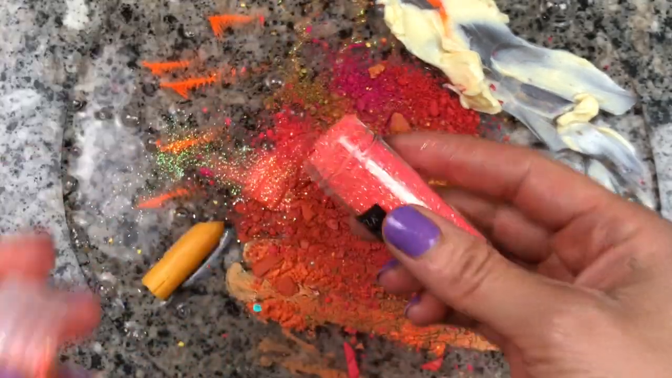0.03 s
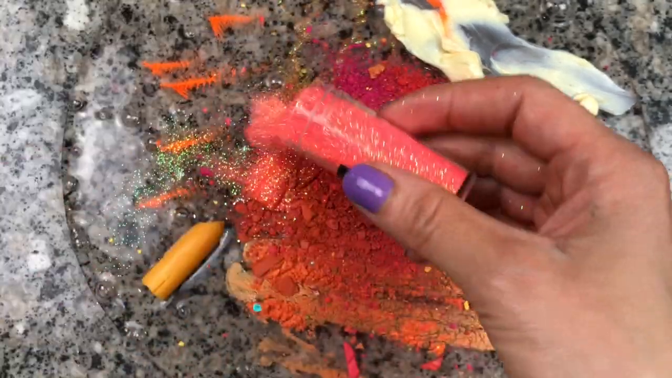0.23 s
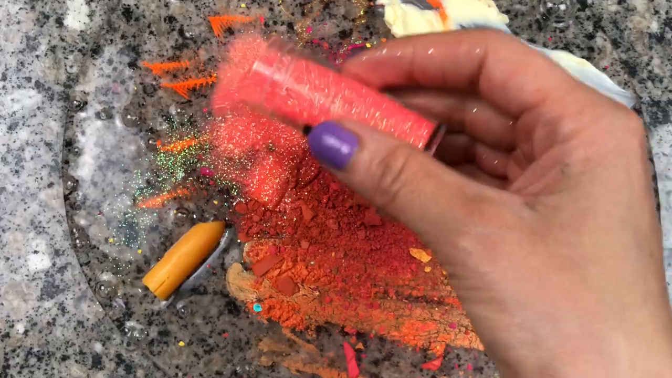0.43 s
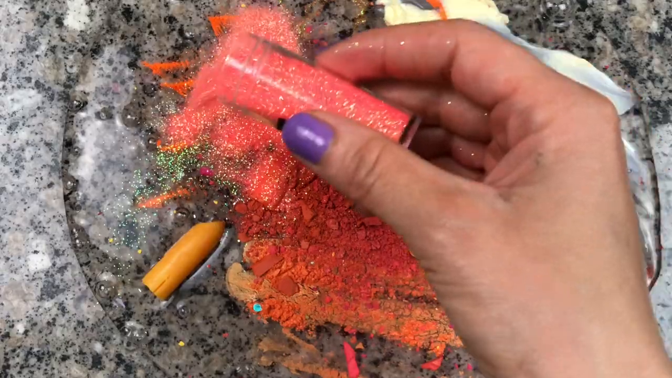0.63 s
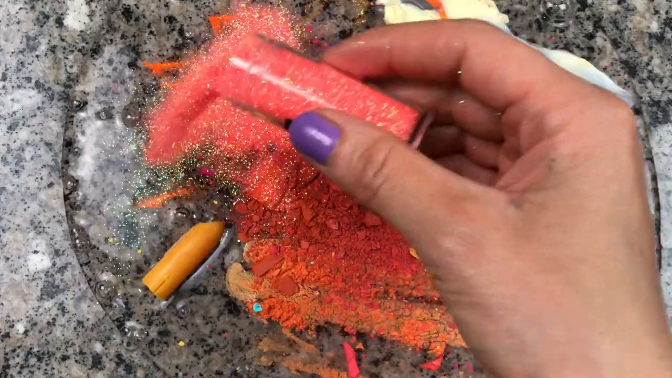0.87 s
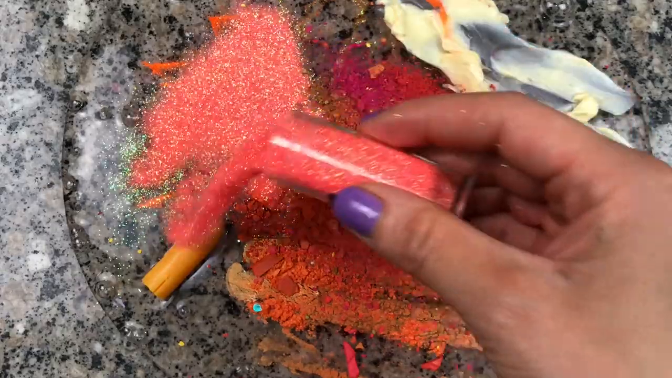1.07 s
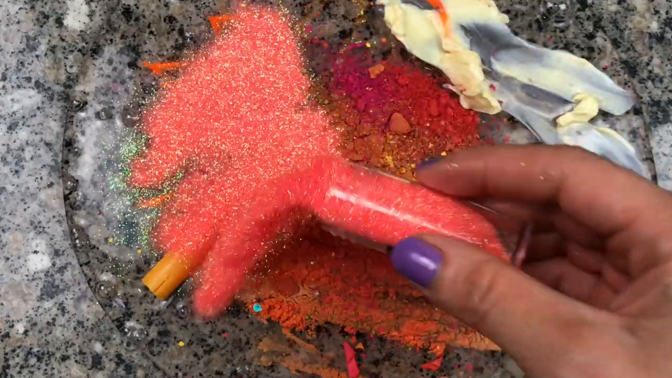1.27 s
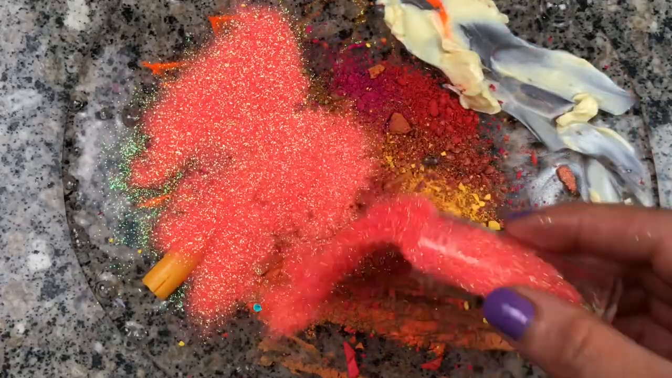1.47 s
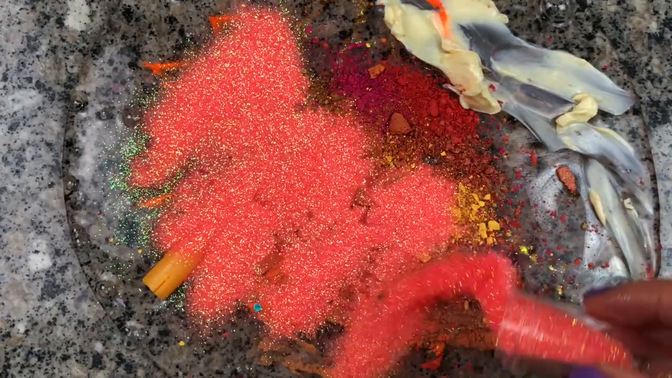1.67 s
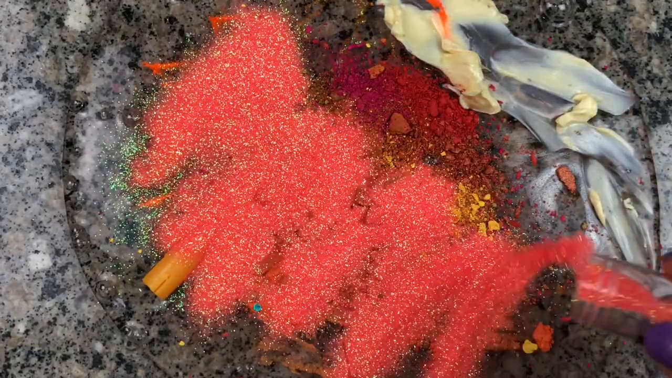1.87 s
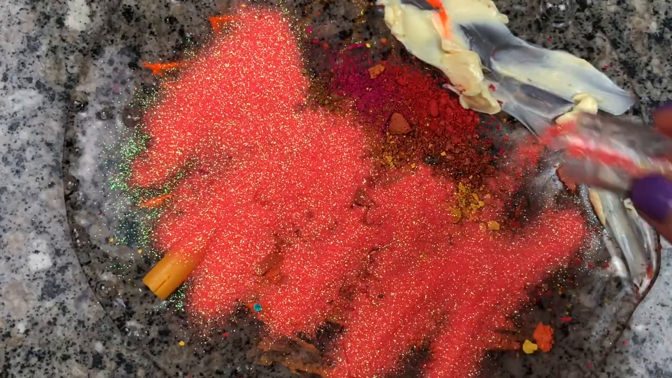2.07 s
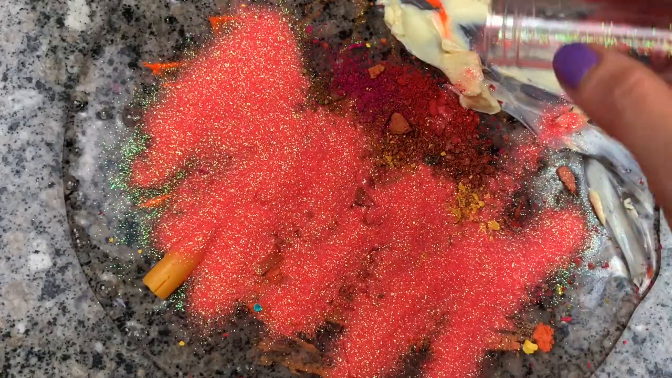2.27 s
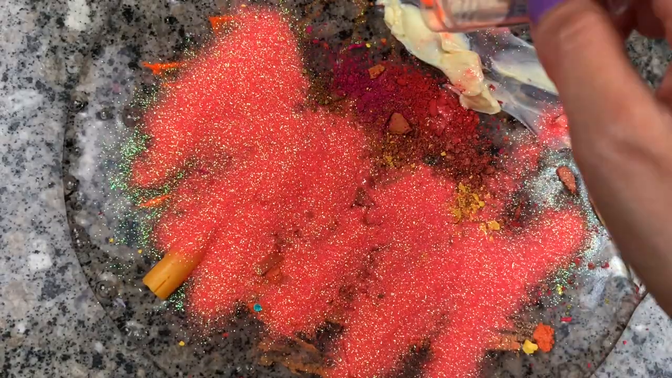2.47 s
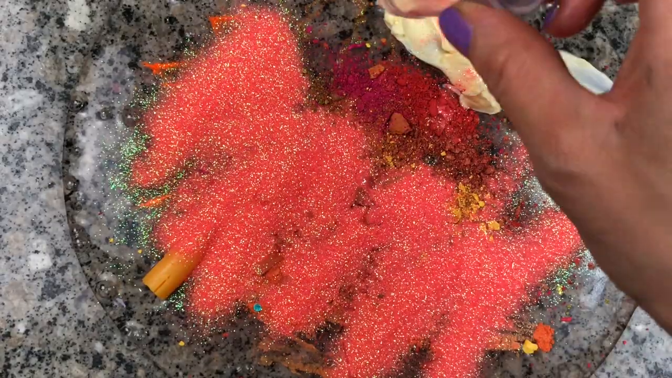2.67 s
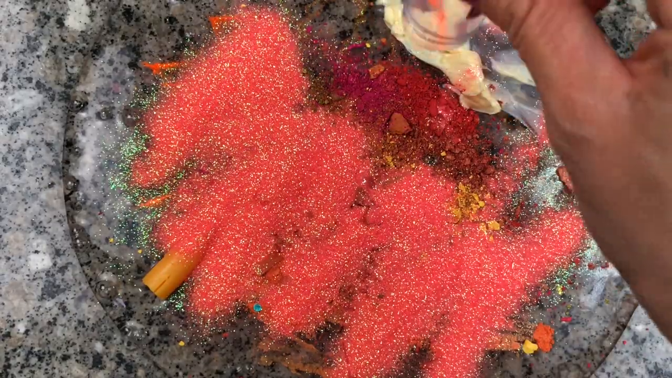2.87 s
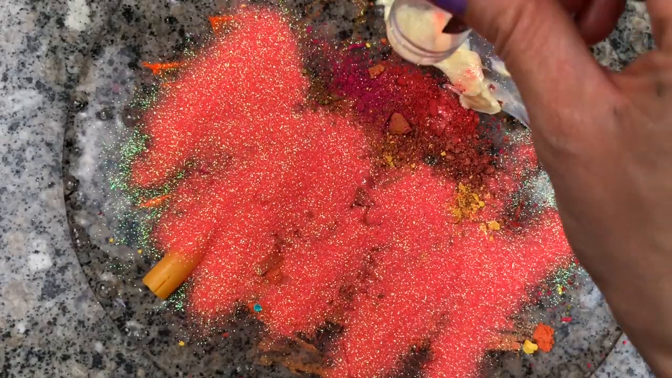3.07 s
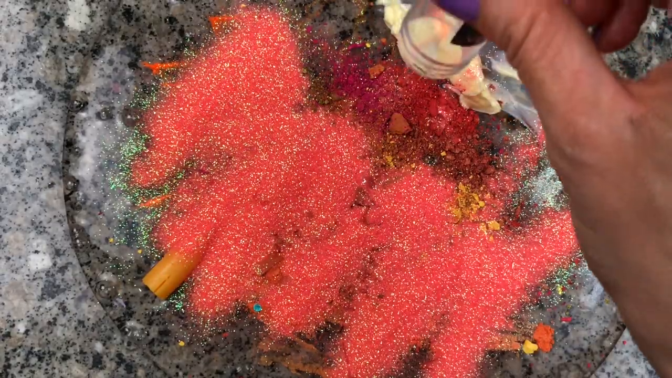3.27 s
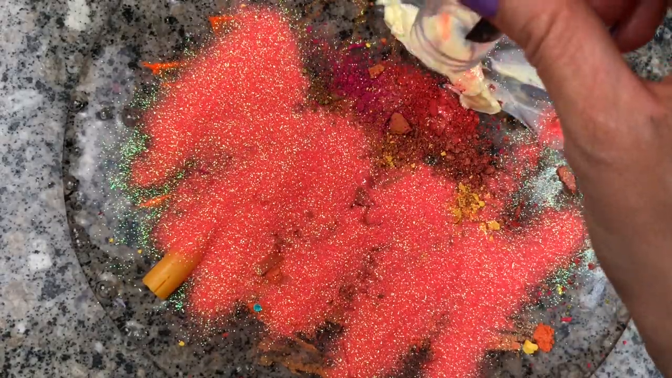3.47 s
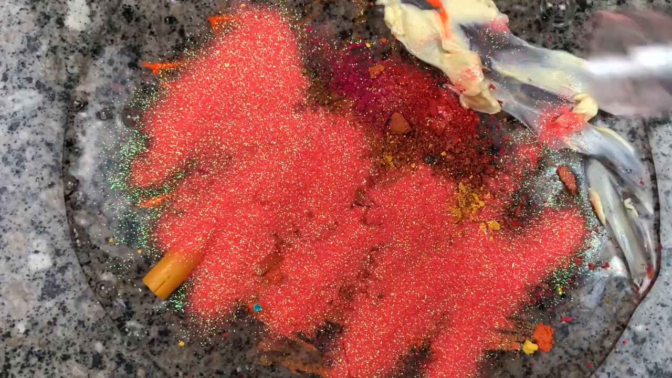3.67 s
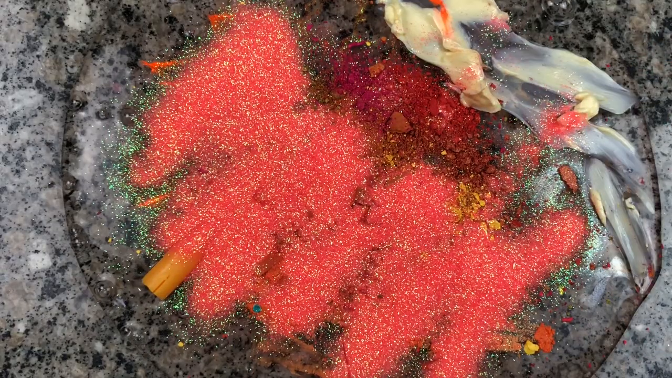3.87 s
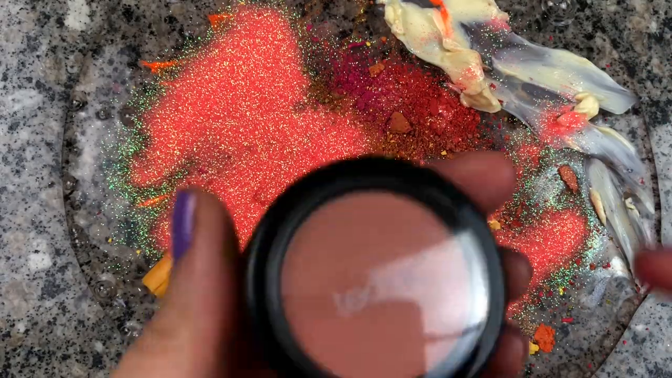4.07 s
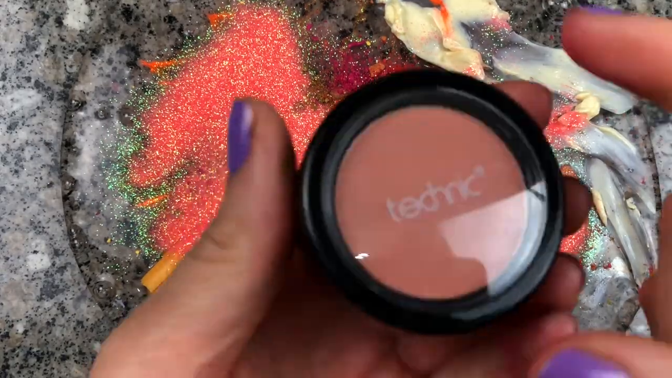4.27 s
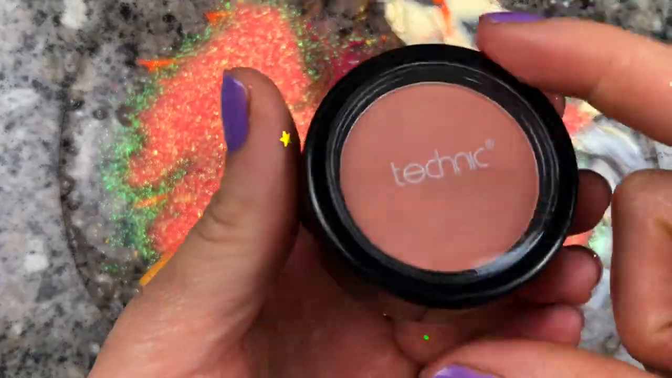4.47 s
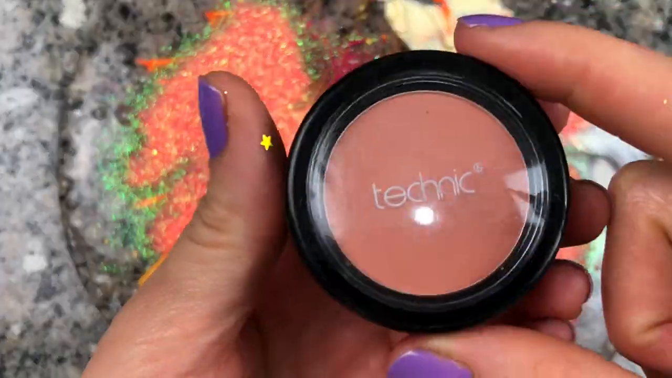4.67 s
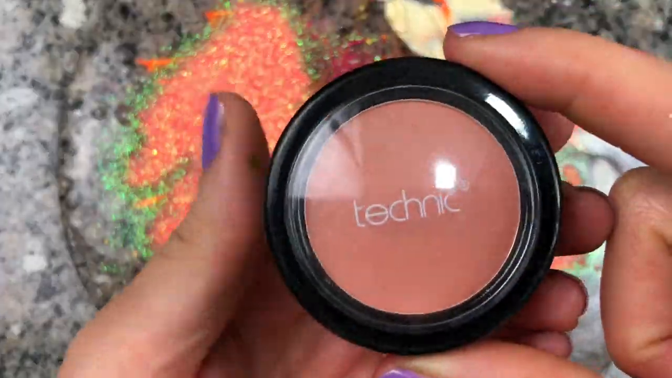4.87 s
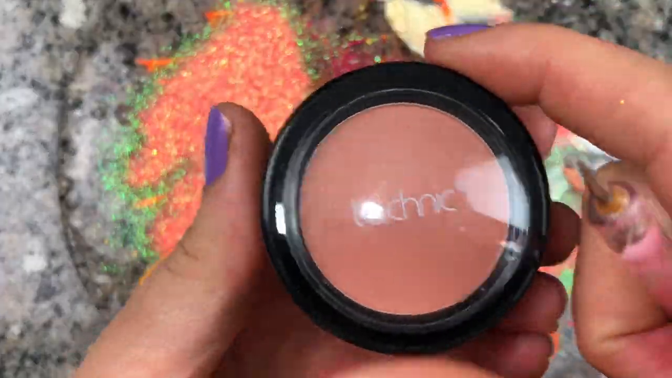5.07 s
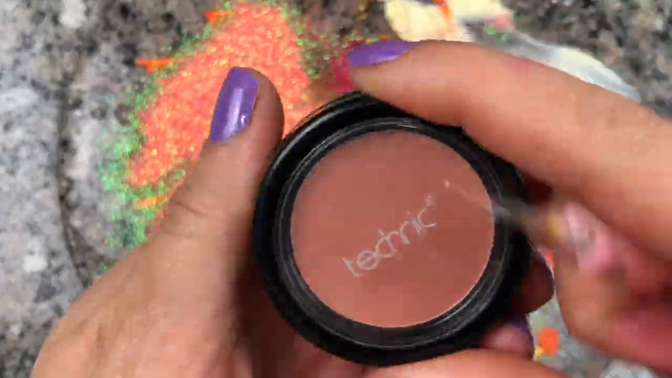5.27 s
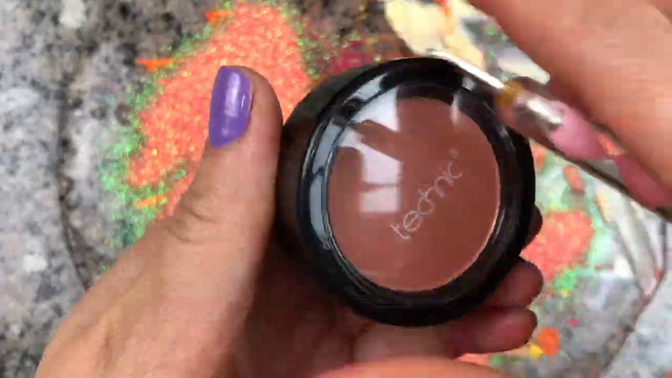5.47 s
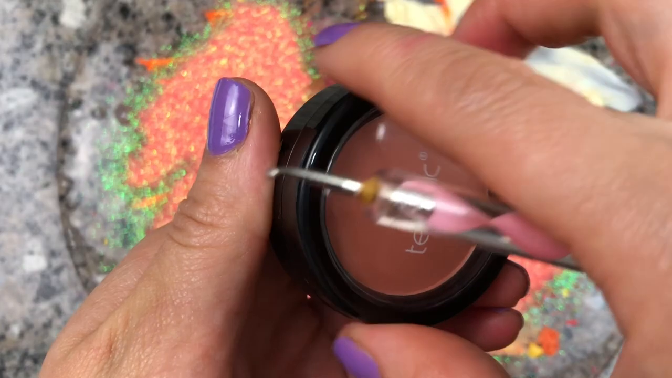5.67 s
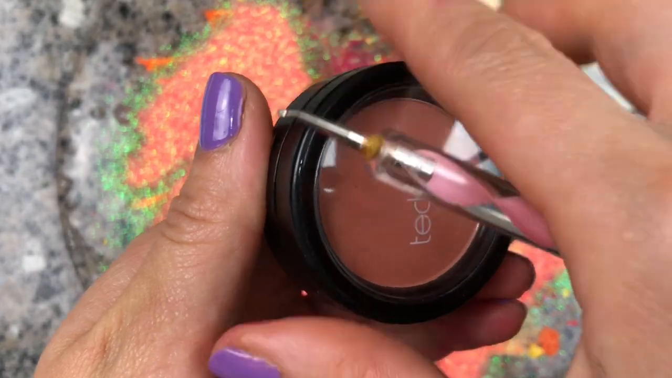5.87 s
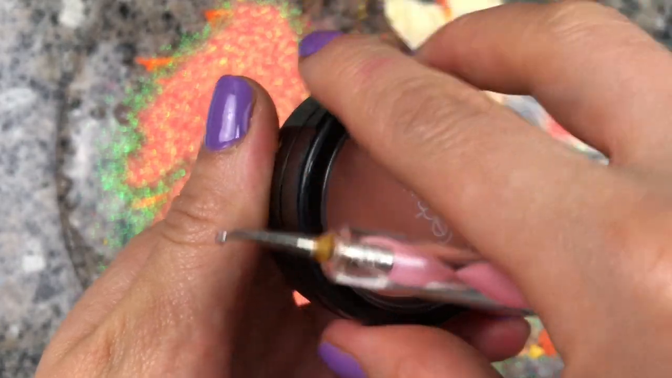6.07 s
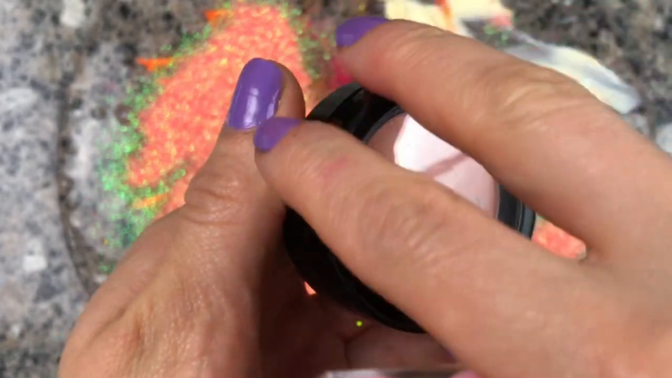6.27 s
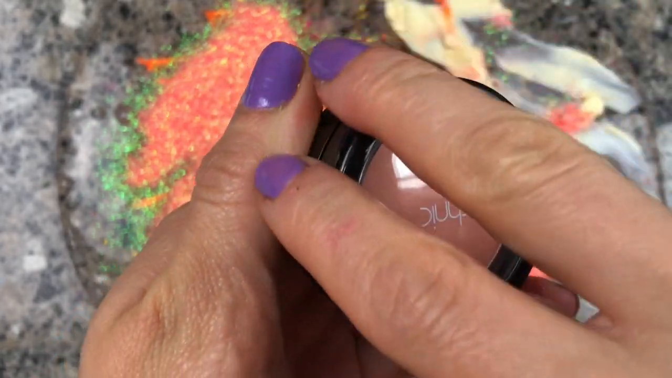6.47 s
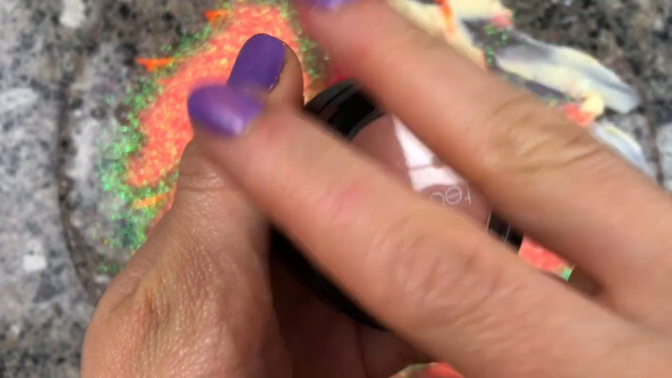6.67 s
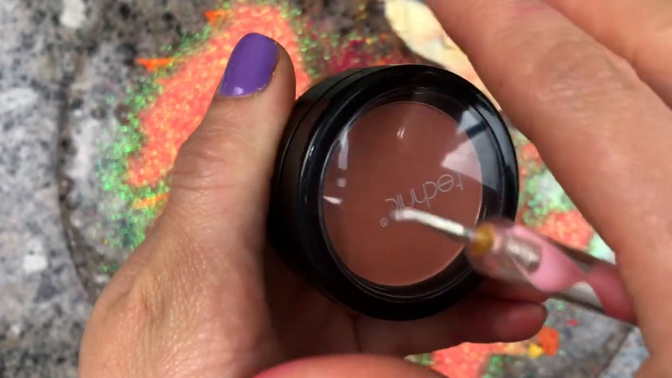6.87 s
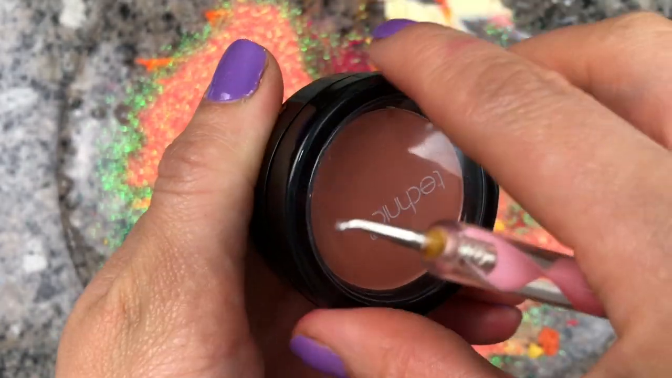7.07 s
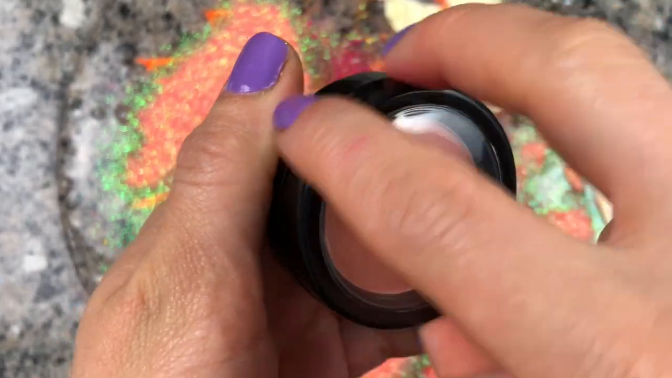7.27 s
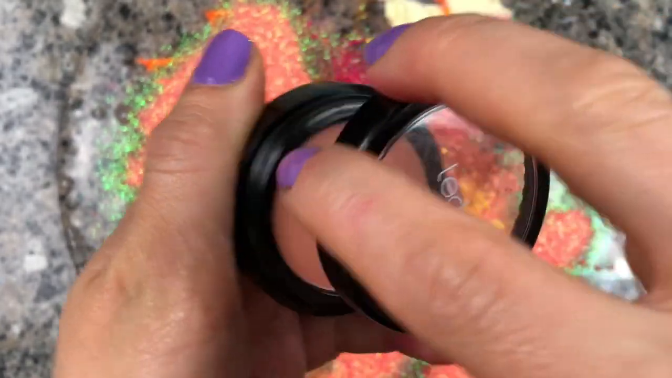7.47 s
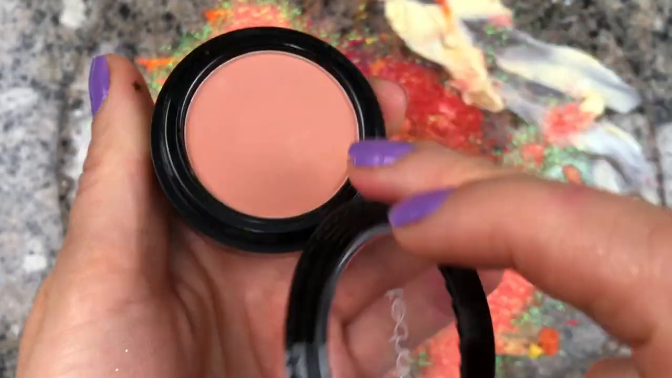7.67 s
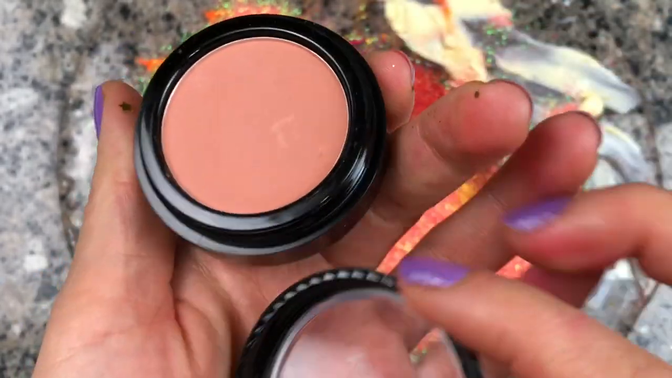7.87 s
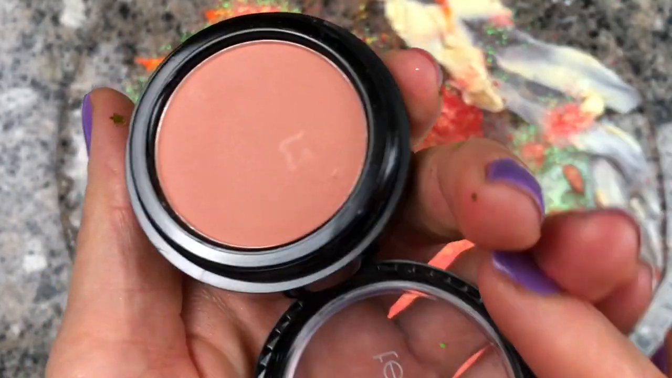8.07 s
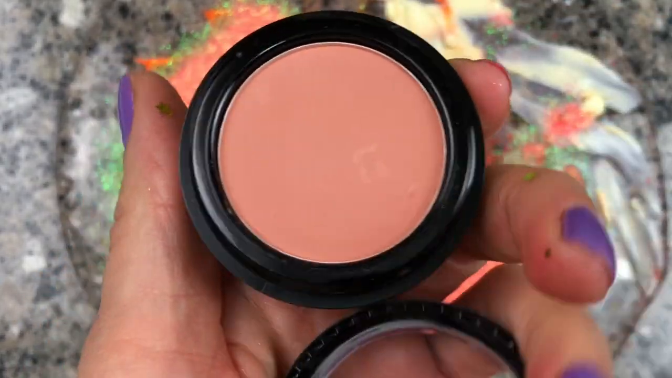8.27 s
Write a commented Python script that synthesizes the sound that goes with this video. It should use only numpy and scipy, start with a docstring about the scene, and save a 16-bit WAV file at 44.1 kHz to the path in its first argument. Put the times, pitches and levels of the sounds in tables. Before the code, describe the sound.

Very close in a small room, over low stand rumble and faint hiss, fingers rustle and fine powder pours softly from a small plastic jar. Fingers tap the empty jar, then three hard, loud clacks sound as it is set down. After a pause, a plastic compact lid turns with gritty scrapes and hollow clicks, snaps sharply, and soft finger rubbing and smaller snaps follow.

```python
"""Close by, over hiss and stand rumble, fingers rustle and powder hisses from a plastic jar: coloured grainy noise.
Next, fingers slide on the jar, tap it and set it down: noise bursts for the wall, damped modes for the air inside.
Then a compact's lid is turned: thread grit and catches sound through the case resonances.
The thin lid snaps and rings, fingers rub it, softer snaps follow: damped modes and noise bursts.
A small room answers throughout; the input clips the loudest blows."""
import sys
import numpy as np
from scipy import signal
from scipy.fft import rfft, irfft, next_fast_len
from scipy.io import wavfile
from scipy.ndimage import uniform_filter1d, map_coordinates

SR = 44100
rng = np.random.default_rng(int(sys.argv[2]) if len(sys.argv) > 2 else 0)


def dump_mix(stems):
    """Bounce the given channels to the path in sys.argv[1] as a 16-bit WAV at rate SR."""
    frames = np.atleast_2d(stems).T  # one column per channel
    limited = np.clip(frames, -1, 1)  # hard clip at full scale
    pcm = np.round(limited * 32767).astype(np.int16)
    wavfile.write(sys.argv[1], SR, pcm)


N = 366471
TIME_S = np.arange(N) / SR
BLOW_S = np.arange(SR // 4) / SR  # time axis of one blow


def amp(db):
    """Decibels to amplitude factor."""
    return 10 ** (np.asarray(db) / 20)


def unit(x):
    """Scale to rms 1."""
    return x / np.sqrt(np.mean(x ** 2) + 1e-20)


def along(points, hz):
    """Interpolate (frequency [Hz], value) points on a log-frequency axis."""
    point_hz, value = np.transpose(points)
    return np.interp(np.log(hz + 1), np.log(point_hz + 1), value)


def curve_db(rows):
    """Level [dB] per sample from (time [s], level [dB]); -120 dB outside the rows."""
    time_s, level_db = np.transpose(rows)
    return np.interp(TIME_S, time_s, level_db, -120, -120)


def filtered(x, response):
    """Apply a complex frequency response, zero-padded against wrap-around."""
    size = next_fast_len(len(x) + 8192)
    return irfft(rfft(x, size) * response(np.fft.rfftfreq(size, 1 / SR)), size)[:len(x)]


def noise(spectrum, grain_db=0, count=N):
    """Coloured noise of rms 1; random per-sample gain, up (grain_db > 0) or down (< 0), makes it grainy."""
    grit = rng.standard_normal(count) * amp(grain_db * rng.exponential(size=count))
    return unit(filtered(grit, lambda hz: amp(along(spectrum, hz))))


def wobble(knots_per_s):
    """Smooth random curve through normally distributed knots."""
    knots = rng.standard_normal(int(N * knots_per_s / SR) + 4)
    return map_coordinates(knots, [np.arange(N) * knots_per_s / SR])


def ring(modes, pitch=1, vary_db=4.0, rise_s=0.000067):
    """Sum of damped modes (frequency, level [dB], t60 [s]), each struck at a random strength."""
    total = np.zeros(len(BLOW_S))
    for hz, db, t60_s in modes:
        decay = amp(db + vary_db * rng.normal() - 60 * BLOW_S / t60_s)
        total += decay * np.sin(2 * np.pi * hz * pitch * BLOW_S)
    return (1 - np.exp(-BLOW_S / rise_s)) * total


def crack(spectrum, t60_s):
    """Contact burst: coloured noise with exponential decay."""
    return noise(spectrum, count=len(BLOW_S)) * amp(-60 * BLOW_S / t60_s)


def add(track, time_s, x):
    """Mix x into track at time_s, cut at the track's end."""
    start = round(time_s * SR)
    track[start:][:len(x)] += x[:N - start]


def resonances(modes):
    """Causal response of (frequency [Hz], width [Hz], level [dB]) peaks of alternating sign."""
    def response(f):
        total = 0
        for k, (hz, width_hz, db) in enumerate(modes):
            total = total + (-1) ** k * amp(db) * 1j * f * width_hz / (hz * hz - f * f + 1j * f * width_hz)
        return total
    return response


def strokes(rows):
    """Gains of strokes fading evenly in dB with 3.4 ms edges: plain, and with each relative dB added."""
    gains = np.zeros((2, N))
    for start_s, length_s, db, fade_db, *relative_db in rows:
        progress = np.linspace(0, 1, max(round(length_s * SR), 2))
        for track, extra_db in zip(gains, [0] + relative_db):
            add(track, start_s, amp(db + extra_db - fade_db * progress))
    return uniform_filter1d(gains, size=round(0.0034 * SR))


# room tone and microphone hiss: (frequency [Hz], density [dB per Hz])
HISS_SPECTRUM = [(53, -25), (90, -4.5), (289, -7.5), (329, -11.5), (853, -19.5), (930, -20.5), (3190, -26),
                 (4320, -28), (7570, -26), (13300, -29.5), (15800, -28.5)]
HISS_DB, HISS_WAVERS_DB = -48.5, 0.48


def hiss():
    """Coloured noise at a slightly wavering level."""
    return amp(HISS_DB + HISS_WAVERS_DB * wobble(4.1)) * noise(HISS_SPECTRUM)


# slow sway of the hands, through the counter: (time [s], level [dB])
HAND_SWAY = [(0.0, -58), (0.23, -28.5), (0.56, -44), (0.64, -29.5), (0.83, -38.5), (1.71, -53.5),
             (2.85, -34), (3.49, -55), (4.88, -48.5), (4.95, -42), (6.23, -56), (6.27, -48), (7.2, -44),
             (7.22, -48), (7.34, -25), (7.71, -43.5), (7.77, -19), (8.31, -46.5)]
SWAY_WAVERS_DB = 5.5


def sway():
    """Hand movement reaches the microphone through its stand as noise mostly below 40 Hz."""
    rumble = noise([(6, -39.5), (16, 16.0), (24, 4), (36, -4.0), (55, -30.5), (80, -120)])
    return amp(curve_db(HAND_SWAY) + SWAY_WAVERS_DB * wobble(5.5)) * rumble


# jolts of the counter: (peak time [s], length [s], bump level [dB], rub level [dB])
COUNTER_JOLTS = [(0.602, 0.16, -54, -51), (2.14, 0.072, -48, -68), (2.282, 0.087, -37.5, -50),
                 (2.613, 0.059, -33.5, -62), (2.791, 0.04, -35, -33), (4.624, 0.036, -50, -34.5),
                 (5.053, 0.2, -42, -47), (5.55, 0.12, -50, -45.5), (5.745, 0.34, -44, -50.5),
                 (6.316, 0.22, -30.5, -35), (6.385, .12, -33, -41.5), (6.528, 0.057, -46.5, -38),
                 (6.795, .2, -35.5, -38.5), (7.265, 0.28, -38, -36), (7.717, 0.26, -31.5, -41.5)]
STEADY_BUMP_DB, STEADY_RUB_DB = -49.5, -58.5
JOLT_RISE_SHARE, JOLT_SLOPE_DB = 0.19, 26  # rise as a share of length; dB per rise and per fall


def jolts():
    """The stand shakes steadily in two low bands; jolts swell and die exponentially in both."""
    bump = noise([(30, -120), (42, -4.5), (65, -0.5), (120, -8.5), (160, -28), (300, -120)])
    rub = noise([(90, -120), (125, 1.5), (170, 1.5), (230, -11.0), (330, -37.5), (500, -120)])
    bump_gain = amp(STEADY_BUMP_DB + 3 * wobble(10))
    rub_gain = amp(STEADY_RUB_DB + 4 * wobble(17))
    for peak_s, length_s, bump_db, rub_db in COUNTER_JOLTS:
        u = (TIME_S - peak_s) / length_s
        swell = amp(-JOLT_SLOPE_DB * np.maximum(u, -u / JOLT_RISE_SHARE))
        bump_gain += amp(bump_db) * swell
        rub_gain += amp(rub_db) * swell
    return bump_gain * bump + rub_gain * rub


# reverberation: (frequency [Hz], t60 [s])
ROOM_DECAY = [(200, .25), (1500, .26), (4000, .24), (9000, .24), (15000, .2)]
ROOM_DELAY_SAMPLES = 180


def room(x):
    """Noise tails with frequency-dependent decay; a new tail is drawn every 1/8 s of input."""
    out, hop = np.zeros(N), SR // 8
    delayed = np.pad(x, (ROOM_DELAY_SAMPLES, 0))[:N]
    for start in range(0, N, hop):
        hz, time_s, bins = signal.stft(rng.standard_normal(SR // 3), SR, nperseg=256)
        decay = amp(-60 * time_s / along(ROOM_DECAY, hz)[:, None])
        tail = signal.istft(bins * decay, SR, nperseg=256)[1]
        add(out, start / SR, signal.fftconvolve(delayed[start:start + hop], tail / np.linalg.norm(tail)))
    return out


# ticks of nails and skin: (time [s], level before trim [dB], pitch [Hz], t60 [s], band width [pitch factor])
SMALL_TICKS = [(0.0354, -35, 3950, 0.061, 0.88), (0.0747, -33, 6950, 0.033, 1.2),
               (0.1394, -35, 7000, 0.03, 1.3), (0.2189, -36.5, 2920, 0.023, 0.89),
               (0.2494, -38.5, 3100, 0.06, 0.95), (0.3556, -33.5, 12200, 0.021, 0.92),
               (0.383, -35.5, 4250, 0.054, 0.89), (0.5688, -37.5, 4060, 0.029, 0.93),
               (0.6094, -44, 4200, 0.033, 0.81), (0.7734, -39, 4000, 0.047, 1.05),
               (0.9542, -29, 3460, 0.039, 1.12), (0.9926, -34.5, 9500, 0.036, 0.81),
               (1.0186, -35.5, 1710, 0.022, 0.88), (1.0387, -33, 7200, 0.039, 2.3),
               (1.3294, -39.5, 6000, 0.027, 1.12), (1.3653, -34.5, 5570, 0.03, 1.12),
               (1.5494, -39, 5900, 0.015, 0.72), (4.6673, -39, 7390, 0.023, 1.1),
               (4.862, -40, 3060, 0.023, 0.91)]


def ticks():
    """Each tick is a short noise burst banded around its own pitch."""
    out = np.zeros(N)
    for time_s, db, hz, t60_s, width in SMALL_TICKS:
        w = max(width, 1.03)
        band = [(hz / 8, -45), (hz / w ** 4, -22), (hz / w, -6), (hz, 0),
                (hz * w, -6), (hz * w ** 4, -20), (hz * 8, -40)]
        add(out, time_s, amp(db - 8.0) * crack(band, max(t60_s, .003)))
    return out


# fingers on cap and jar: (start [s], length [s], level [dB], fade [dB])
FINGER_RUSTLE = [(0.02, 0.18, -51.5, 2.5), (0.215, .1, -45, 17), (0.378, .16, -61, 10),
                 (0.57, 0.14, -54, 20), (0.775, .06, -51.5, 22), (0.95, 0.15, -56, 16)]
# skin friction: (frequency [Hz], density [dB per Hz])
SKIN_SPECTRUM = [(880, -33.5), (1500, -1), (2230, -0.5), (3220, 5.5), (4520, -1), (4760, -12), (7300, 2),
                 (9000, -15), (11700, -40.5), (19800, -120)]


def rustle():
    """Skin friction: strokes of grainy noise."""
    return strokes(FINGER_RUSTLE)[0] * amp(1.7 * wobble(40.7)) * noise(SKIN_SPECTRUM, grain_db=1)


# powder flow: (time [s], level [dB])
POUR_LEVEL = [(0.0, -59), (0.1, -55), (0.45, -59.5), (0.6, -64.5), (0.98, -53), (1.05, -53.5), (1.52, -50),
              (1.95, -65), (2.15, -65)]
# powder, early and as the jar empties: (frequency [Hz], density [dB per Hz])
POWDER_EARLY_SPECTRUM = [(2350, -30), (4000, -24), (4810, -21.5), (5880, 2.5), (7970, -16), (9530, 4),
                         (15800, -3)]
POWDER_LATE_SPECTRUM = [(2350, -30), (5000, -20), (5900, -3), (7300, -12.5), (8800, 5.5), (10500, -1),
                        (15800, -3.5)]
COLOUR_SHIFT_S = 1.2, 1.6  # from, to


def powder():
    """Many grains hiss as grainy noise, crossfading to a second colour as the jar empties."""
    late = np.interp(TIME_S, COLOUR_SHIFT_S, (0, 1))
    grains = (1 - late) * noise(POWDER_EARLY_SPECTRUM, grain_db=3.0)
    grains += late * noise(POWDER_LATE_SPECTRUM, grain_db=2.0)
    return amp(curve_db(POUR_LEVEL) + 1.2 * wobble(25) + 1.5 * wobble(12)) * grains


# fingers sliding on the jar: (start [s], length [s], wall level [dB], fade [dB], air relative to wall [dB])
JAR_SLIDES = [(2.19, .17, -46, -2.5, -10), (2.372, .3, -53, 12.5, -5.5), (2.62, .14, -56, 3, -9.5),
              (2.788, .08, -47, 29, -20)]
# rubbed wall: (frequency [Hz], density [dB per Hz])
JAR_RUB_SPECTRUM = [(2060, -51), (3500, -32.5), (4260, -17), (4560, -11), (5370, -19), (6830, -1),
                    (7850, -12.5), (8960, 10.5), (11200, -16), (14100, 2), (15800, -20.5)]
# air in the jar, a tube closed at one end; also rung by blows: (frequency [Hz], level [dB], t60 [s])
JAR_AIR_MODES = [(1430, 0, .06), (1460, -10, .04), (4210, -24, .12)]


def jar_slides():
    """Friction noise sounds the wall and excites the air column's first and last listed modes."""
    wall_gain, air_gain = strokes(JAR_SLIDES)
    tube = resonances([(JAR_AIR_MODES[0][0], 50, 0), (JAR_AIR_MODES[-1][0], 120, -14)])
    air = unit(filtered(rng.standard_normal(N), tube))
    return wall_gain * amp(1.5 * wobble(60)) * noise(JAR_RUB_SPECTRUM, grain_db=-1.5) + air_gain * air


# nail and finger taps, then two touches of the jar being set down (last two rows); levels before trim:
# (time [s], crack level [dB], air level [dB], thump level [dB], knock level [dB])
JAR_BLOWS = [(2.1918, -29.5, -48, -33, -65), (2.2536, -37, -64, -48.5, -53), (2.312, -33, -57, -37, -51.5),
             (2.378, -26, -44, -31.5, -40), (2.4, -55, -70, -35, -52), (2.4281, -31.5, -51, -37, -47.5),
             (2.603, -36.5, -48.5, -27, -45), (2.6526, -28.5, -43, -34, -49),
             (2.6983, -42.5, -61, -47, -51), (2.7861, -36.5, -46.5, -24.5, -39),
             (2.9381, 1, -15, -17, -16.5), (3.1275, 5.5, -17, -22, -18.5), (3.206, -29, -53, -39.5, -50.5),
             (3.3081, 5, -17, -27, -17), (3.489, -32, -68, -55, -45), (3.5304, -27.5, -51.5, -44.5, -27)]
# wall at contact, wall shivering on: (frequency [Hz], density [dB per Hz])
JAR_WALL_SPECTRUM = [(1470, -60.5), (2500, -16.5), (3460, -24), (4160, -6), (5320, -14.5), (7310, -2.5),
                     (7950, -6.5), (10300, 0.5), (14100, -13.5), (15800, -25)]
JAR_TAIL_SPECTRUM = [(2500, -31), (4000, -28), (5500, -18), (7000, -10), (10000, 4.5), (12500, -8.5),
                     (14300, -7), (15800, -18)]
CLICK_DB = -14  # flat contact click re wall crack


def jar_blows():
    """A tap or set-down cracks the wall, rings the air column, thumps low and knocks in the mid band."""
    out = np.zeros(N)
    for time_s, crack_db, air_db, thump_db, knock_db in JAR_BLOWS:
        wall = crack(JAR_WALL_SPECTRUM, 0.012) + 0.049 * crack(JAR_TAIL_SPECTRUM, 0.17)
        wall += amp(CLICK_DB) * crack([(800, -18), (2500, 0), (15000, 0.5)], 0.0039)
        air = ring(JAR_AIR_MODES)
        thump = -ring([(58.7, 0.0, 0.072), (147, -12.5, .04)], vary_db=0.5, rise_s=.002)
        knock = crack([(100, -18.0), (200, -4.0), (800, 6.5), (1100, -3.5), (2400, -6.0), (3500, -20.0)], .015)
        add(out, time_s, amp(crack_db - 4) * wall + amp(air_db + 5.0) * air
            + amp(thump_db + 9.0) * thump + amp(knock_db + 2.5) * knock)
    return out


# thread strokes as the lid turns:
# (start [s], length [s], body level [dB], fade [dB], treble relative to body [dB])
THREAD_STROKES = [(5.048, .145, -26, 12, -3), (5.2, 0.12, -21.5, 33, -17.5), (5.455, 0.1, -33.5, -9.5, -10),
                  (5.514, 0.082, -26, 5, -14), (5.582, 0.057, -25.5, 15.5, -4.5), (5.65, .05, -35, 27, -20),
                  (5.79, 0.04, -38.5, 5, -13), (5.85, 0.03, -18.5, 18.5, -26.5), (5.885, .09, -38, 2, -6),
                  (5.984, .135, -31.5, 10.5, -7), (6.12, 0.081, -34.5, 15.5, -6), (6.2, .165, -50, -4, -6),
                  (6.366, .1, -43.5, 14, -4), (6.474, 0.064, -42, -2, -6.5), (6.925, .045, -44, 2.5, -5.5),
                  (6.974, 0.045, -37.5, -4.5, -7), (7.032, .065, -37, 4, -7.5), (7.1, .12, -38, 8, -6),
                  (7.22, 0.021, -44.5, -5.5, -10), (7.254, 0.027, -24, 7.5, -10.5),
                  (7.44, 0.026, -42.5, 29.5, 6), (7.512, .09, -41, 37.5, 2)]
# closed compact: (frequency [Hz], width [Hz], level [dB])
CASE_RESONANCES = [(1430, 240, 0), (1650, 200, -3), (2180, 300, -8), (2980, 300, -8), (3290, 70, -6),
                   (4815, 70, -14), (6720, 400, -12), (7900, 200, -18), (9700, 400, -20), (12700, 400, -20),
                   (14500, 900, -17)]
# direct friction: (frequency [Hz], density [dB per Hz])
FRICTION_SPECTRUM = [(150, -52.5), (250, -8.5), (759, -7.5), (903, -12), (1600, 4.5), (2740, -13.5),
                     (3090, -18.5), (3810, -17), (5300, -14), (6640, -12.5), (8170, -22.5), (10100, -10.5),
                     (11200, -32.5), (14000, -16), (15800, -22.5)]
SLIPS_PER_S, SLIP_SPREAD_DB, SLIP_SHARE = 450, 4, .8  # share re rms of the other grit
TREBLE_FROM_HZ = 3800


def thread_scrape():
    """Friction and small uneven slips excite the case; its body flutters as the thread sticks and slips."""
    case = resonances(CASE_RESONANCES)
    direct = noise(FRICTION_SPECTRUM, grain_db=2) * amp(0.97 * wobble(40) + 1.4 * wobble(230))
    drive = noise([(300, 0.006), (16000, 0.017)], grain_db=0.5)
    grit = unit(direct) + 1.01 * unit(filtered(drive, case))
    slip_times = rng.random(N) < SLIPS_PER_S / SR
    slips = slip_times * rng.choice([-1, 1], N) * amp(SLIP_SPREAD_DB * rng.exponential(size=N))
    grit = unit(grit) + SLIP_SHARE * unit(filtered(slips, case))
    body = unit(filtered(grit, lambda hz: hz < TREBLE_FROM_HZ))
    treble = unit(filtered(grit, lambda hz: hz >= TREBLE_FROM_HZ))
    body = unit(body * amp(2 * wobble(120)))
    body_gain, treble_gain = strokes(THREAD_STROKES)
    return body_gain * body + treble_gain * treble


# catches of the thread, and the lead-in and rim ring of the first lid snap (6.5165 to 6.5443 s);
# levels before trim:
# (time [s], body level [dB], crack level [dB], knock level [dB], body pitch [Hz], t60 [s])
SHELL_BLOWS = [(5.0502, -11.5, -9, -66.5, 1900, 0.0054), (5.1649, -21.5, -47, -26, 1500, 0.027),
               (5.1979, 5.5, -4, -37, 1500, 0.015), (5.2327, -17.5, -32, -26.5, 1340, 0.01),
               (5.2674, -26, -46, -31, 1360, 0.013), (5.4524, -5, -9.5, -42.5, 1422, 0.02),
               (5.4817, -15.5, -21.5, -32.5, 1450, 0.021), (5.4989, -8, -24, -28, 1460, 0.019),
               (5.5182, -5.5, -20, -48.5, 1500, 0.012), (5.5785, 0.5, -1.5, -9, 1610, 0.005),
               (5.6074, -33, -35.5, -26.5, 1480, 0.0092), (5.656, -28, -40.5, -37, 1690, 0.015),
               (5.669, -26, -47.5, -48, 1640, 0.012), (5.7955, -31, -43, -27.5, 1320, 0.02),
               (5.8216, -5.5, -22, -15, 1473, 0.025), (5.8296, -11, -20, -24, 1560, 0.021),
               (5.8488, -5.5, -19, -27, 1416, 0.013), (5.8564, -29, -42, -50, 1660, 0.015),
               (5.9348, -35, -39.5, -29.5, 1410, 0.015), (5.947, -26.5, -45, -32, 1600, 0.013),
               (5.98, -19, -12, -20, 1405, 0.037), (6.0117, -26.5, -40, -30, 1460, 0.042),
               (6.0686, -26.5, -50, -50, 1420, 0.035), (6.128, -23, -25, -42, 1607, 0.045),
               (6.1694, -34, -48, -56.5, 1590, 0.045), (6.2801, -29.5, -38, -49, 1650, 0.015),
               (6.3702, -22, -21, -56, 1620, 0.024), (6.4792, -28.5, -33, -40, 1530, 0.03),
               (6.49, -32, -47, -41.5, 1716, 0.015), (6.5165, -22.5, -46, -40, 1650, 0.028),
               (6.52, -12, -34.5, -30, 1680, 0.05), (6.529, -6.5, -30, -21, 1680, 0.04),
               (6.5443, -12, -30.5, -19.5, 1390, 0.014), (6.9271, -26.5, -46, -30, 1410, 0.013),
               (6.9745, -18, -46, -39, 1420, 0.025), (6.998, -23.5, -32, -34, 1410, 0.015),
               (7.0251, -17.5, -22, -20.5, 1370, 0.03), (7.101, -16, -45.5, -30, 1460, 0.006),
               (7.1058, -21.5, -42.5, -31.5, 1470, 0.017), (7.1113, -18, -41.5, -25.5, 1420, 0.028),
               (7.1668, -18.5, -46.5, -31, 1420, 0.021), (7.2238, -32, -37.5, -31, 1500, 0.013),
               (7.2432, -20.5, -38.5, -29, 1600, 0.012), (7.2477, -1.5, -23.5, -18, 1755, 0.011),
               (7.263, -16.5, -30, -36, 1700, 0.012), (7.266, -19.5, -30, -32.5, 1600, 0.0099),
               (7.4489, -61.5, -27, -62, 1440, 0.013), (7.5153, -37, -23.5, -60.5, 1620, 0.015)]
SPIKE_DB, SPIKE_T60_S = -2.5, 0.0026  # first sharp instant


def shell_blows():
    """A thread catch, or a part of the first snap, rings the shell with a bright crack and a low knock."""
    out = np.zeros(N)
    bright = [(2500, -45.0), (4000, 4.0), (6700, 13.0), (10000, -0.5), (15500, 1.5)]
    shell_band = [(500, -28.5), (1100, -23.5), (1500, 13), (3300, -3.5), (3800, -29.5)]
    knock_band = [(150, -23.5), (300, -5), (600, -1.5), (900, 0), (1500, -28.5)]
    for time_s, body_db, crack_db, knock_db, hz, t60_s in SHELL_BLOWS:
        modes = [(hz, -1.5, t60_s), (1750, -6, t60_s / 2), (1900, SPIKE_DB, SPIKE_T60_S)]
        shell = ring(modes, vary_db=2, rise_s=0.00048) + 0.51 * crack(shell_band, t60_s)
        add(out, time_s, amp(body_db + 2.5) * shell + amp(crack_db - 6) * crack(bright, 0.02)
            + amp(knock_db - 2.5) * crack(knock_band, 0.033))
    return out


# fingers on the freed lid:
# (start [s], length [s], ringing level [dB], fade [dB], skin hiss relative to ringing [dB])
LID_STROKES = [(7.695, .035, -58, 8, -6), (7.745, 0.16, -51.5, 8, 4.5), (8.06, .05, -61, 5.5, 13.5),
               (8.11, .14, -49.5, 22.5, -0.5)]


def lid_rub():
    """Rubbing excites three lid resonances along with the hiss of skin."""
    lid = resonances([(3240, 60, 6.0), (4840, 89, -3.0), (6860, 99, -11)])
    hum = unit(filtered(rng.standard_normal(N), lid))
    skin = noise([(3000, -30.5), (6800, -3.5), (8500, -7.5), (10000, -4), (13000, -4.0), (15800, -4.0)],
                 grain_db=-0.5)
    hum_gain, skin_gain = strokes(LID_STROKES)
    return hum_gain * hum + skin_gain * skin


# snaps, levels before trim except crack: (time [s], crack level [dB], rim level [dB], hollow level [dB],
# low level [dB], mid level [dB], high level [dB], low pitch [Hz])
LID_SNAPS = [(6.529, 2, -35.5, 2.5, -1, -14, -14.5, 3358), (7.28, 3, -33, 1.5, -20, 0, -23.5, 3295),
             (7.6344, -63, -68.5, -58, -51.5, -62, -67, 3210),
             (7.8505, -51.5, -59.5, -59, -50, -48, -65.5, 3210),
             (7.895, -14, -23.5, -9, 1, -17.5, -25, 3245), (8.0889, -40, -42, -25, -41, -53, -58.5, 3310),
             (8.1325, -48, -50.5, -37, -41, -53, -59.5, 3200),
             (8.1509, -48, -61.5, -38, -41, -46, -49, 3235)]
# low lid modes, following the grip: (multiple of the snap's low pitch, level [dB], t60 [s])
LID_LOW_MODES = [(.99, -1, 0.095), (.92, -14, 0.056), (0.62, -16, 0.032), (0.97, -6, 0.046),
                 (.83, -17, 0.059)]
# mid and high lid modes, and the rim's: (frequency [Hz], level [dB], t60 [s])
LID_MID_MODES = [(4815, -18, .25), (4822, 0, .055), (4400, -22, .06), (4670, -16, .03)]
LID_HIGH_MODES = [(6730, -2, .07), (7910, 0, .09), (7760, -8, .05), (9550, -12, .05), (11140, -16, .04),
                  (12500, -16, .04), (14500, -16, .04)]
RIM_MODES = [(1510, 0, .12), (1650, -8, .03), (1320, -10, .03)]
# hollow of the case under the lid, slap of the lid's edge: (frequency [Hz], density [dB per Hz])
HOLLOW_SPECTRUM = [(600, -30), (1200, -8), (2000, 0), (2800, 0), (3300, -6), (3700, -30)]
SLAP_SPECTRUM = [(200, -8), (1000, -14), (3000, -14.5), (3900, -17), (4700, 8.5), (5300, -11), (6500, 3),
                 (9000, -10), (15500, -11)]


def lid_snaps():
    """The lid's edge slaps, the hollow answers in banded noise, and rim and lid ring in damped modes."""
    out = np.zeros(N)
    for time_s, crack_db, rim_db, hollow_db, low_db, mid_db, high_db, low_hz in LID_SNAPS:
        slap = crack(SLAP_SPECTRUM, 0.0041) + 0.27 * crack(SLAP_SPECTRUM, 0.082)
        hollow = crack(HOLLOW_SPECTRUM, 0.014) + 0.24 * crack(HOLLOW_SPECTRUM, 0.077)
        ringing = amp(rim_db) * ring(RIM_MODES, vary_db=1.0) + amp(hollow_db) * hollow
        ringing += amp(low_db) * ring(LID_LOW_MODES, low_hz, vary_db=0.5)
        ringing += amp(mid_db) * ring(LID_MID_MODES, vary_db=1.0)
        ringing += amp(high_db) * ring(LID_HIGH_MODES, vary_db=3)
        add(out, time_s, amp(crack_db) * slap + amp(0.5) * ringing)
    return out


def scene():
    """Near sources, their room answer above 200 Hz, and the background."""
    background = hiss() + sway() + jolts()
    jar = rustle() + powder() + jar_slides() + jar_blows()
    compact = thread_scrape() + shell_blows() + lid_rub() + lid_snaps()
    near = ticks() + jar + compact
    return (near + amp(-14.5) * room(filtered(near, lambda hz: hz > 200)) + background)[None]


BAND_LIMIT_HZ = 15900


def record(dry):
    """The input clips at full scale, then keeps nothing above its band limit."""
    return filtered(np.clip(dry[0], -1, 1), lambda hz: hz < BAND_LIMIT_HZ)[None]


dry = scene()
out = record(dry)
dump_mix(out)
```